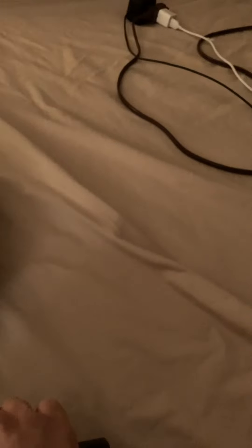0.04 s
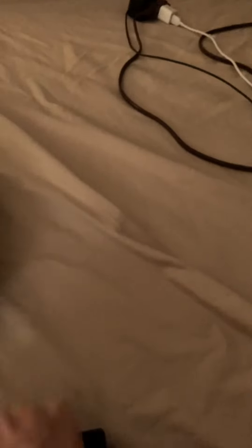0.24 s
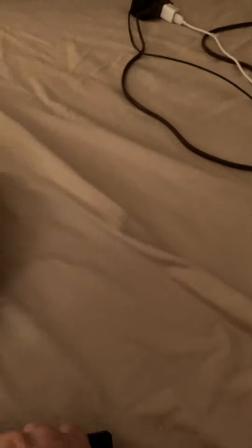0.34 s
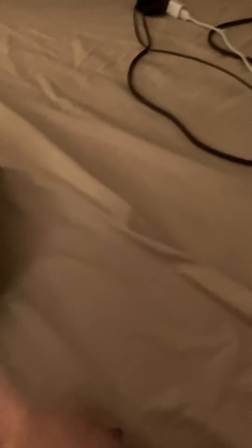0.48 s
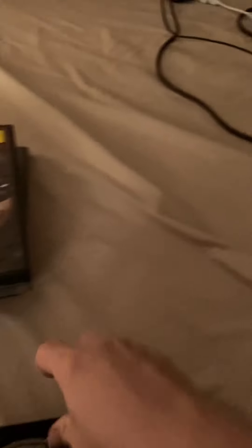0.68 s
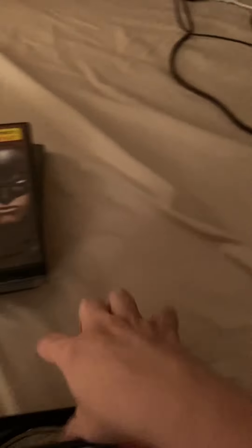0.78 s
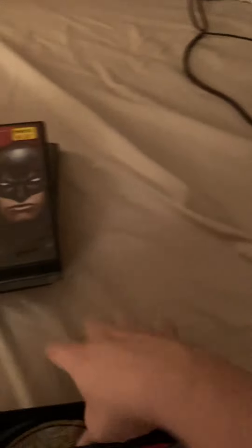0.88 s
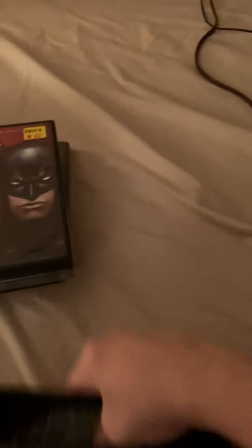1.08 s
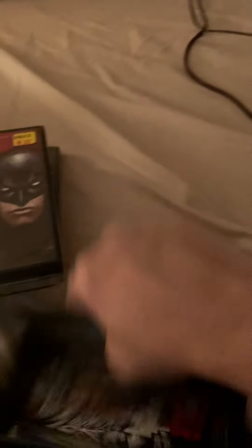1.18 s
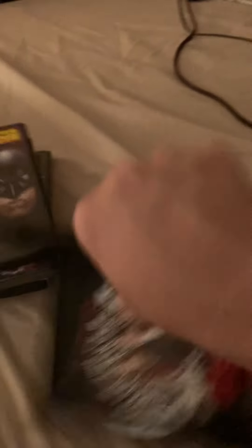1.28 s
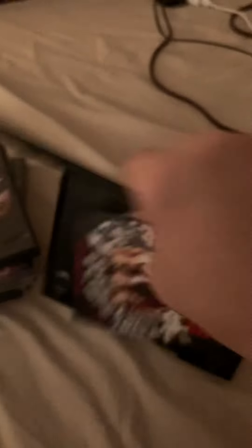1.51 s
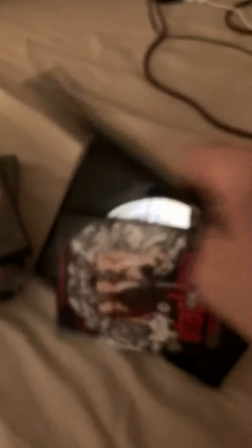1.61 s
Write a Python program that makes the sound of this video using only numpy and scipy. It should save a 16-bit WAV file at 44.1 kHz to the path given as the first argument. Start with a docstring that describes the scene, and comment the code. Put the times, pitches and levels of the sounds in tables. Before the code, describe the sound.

A hollow plastic disc case snaps open in a rapid run of pops, followed by faint scraping and light clicks, then a loud clack as it lands on a bed, close up in a small quiet bedroom.

```python
"""In a small bedroom, close to two microphone ports, a plastic disc case is snapped open over a bed.
Its catches pop in a quick run of damped shell modes, noise clacks, bright ticks and edge pings.
Random slips and hiss make fingers scrape the shell and paper insert, and a hand brush the sheet.
Soft thumps, runs of slip clicks and gliding squeaks join in; the open case clacks down and settles.
A steady noise floor lies underneath, and a short decaying-noise room tail follows the case."""
import sys
import numpy as np
from scipy import signal
from scipy.fft import rfft, irfft, next_fast_len
from scipy.io import wavfile

SR = 44100
rng = np.random.default_rng(int(sys.argv[2]) if len(sys.argv) > 2 else 0)


def dump(signal):
    """Clip the signal to [-1, 1] and save it as 16-bit WAV at the path in sys.argv[1]."""
    limited = np.clip(np.atleast_2d(signal).T, -1, 1)
    pcm = np.round(limited * 32767).astype(np.int16)
    wavfile.write(sys.argv[1], SR, pcm)


N = 72765

# In every colour table the levels shape the tone only; the sound's loudness is set elsewhere.
# Tone of the quiet room: freq_hz, level_db
FLOOR_TONE = [(25, -13), (65, -3.5), (140, -5.5), (260, -15.5), (500, -17.5), (900, -33.5), (4000, -29.5),
              (16000, -41)]
# Decay of the room: freq_hz, t60_s
ROOM_DECAY = [(100, 0.35), (500, 0.18), (2000, 0.29), (8000, 0.2), (16000, 0.039)]
# Stereo width of the room tail: freq_hz, side_over_mid_db
TAIL_WIDTH = [(60, -18), (350, -19), (1000, -1), (8000, -1)]
# Arrival at the two ports, shut case held in the hands: freq_hz, left_lead_rad, left_minus_right_db
# In all three port tables the differences are scaled down below BASS_ALIKE_HZ.
HELD_ARRIVAL = [(200, 1, 1.5), (520, 0, -0.5), (633, -1.7, -5), (739, -4, -7), (1030, -5.5, 0.5),
                (1310, -5.5, 1), (1635, -3.5, -4), (2008, -1.5, -5.5), (2700, -2.5, 1), (3016, -3, 4.5),
                (3440, -6, -.5), (3940, -5.5, 0.5), (4940, -4, 2), (5810, -2.5, 0), (7950, -1, -1),
                (9340, 0.86, -1), (11030, 2.5, 5), (13800, 5, -2.5)]
# The same for the open case in the hands: freq_hz, left_lead_rad, left_minus_right_db
OPEN_ARRIVAL = [(200, 1, 0), (510, 0.44, -1), (678, -1.7, -7), (677, -4, -6), (1000, -4.5, 1),
                (1510, -5.5, 1.5), (1980, -3, -7), (2360, -1.15, 2), (2660, -1.67, 1), (3340, -2, 0),
                (4300, -1.5, -0.5), (5600, -3, -1), (6420, -2, 1.5), (8100, -0.46, 0), (9290, 0.53, -1),
                (10830, 2.5, 0.5), (13800, 5.5, -1)]
# The same for the case on the bed: freq_hz, left_lead_rad, left_minus_right_db
BED_ARRIVAL = [(200, 1, -2), (450, -1.3, 1), (652, -0.4, -6), (692, -3, -5.5), (1230, -6, 0.5),
               (1530, -6, 2), (2190, -8, -0.5), (2550, -8, 2), (3220, -8.5, -6), (3850, -11, 6),
               (4340, -8, 2.5), (5100, -9, -3), (6660, -8.5, 2.5), (7900, -7, 0), (9760, -5, -1.5),
               (11200, -4, 6), (12000, -4.5, -6), (15100, 1, 4)]
# The flexing lid and the case meeting the mattress: start_s, level_db
THUMP_EVENTS = [(0.21, -19), (.243, -12.5), (0.264, -28.5), (.306, -35.5), (0.376, -50), (0.409, -44),
                (0.638, -45), (0.917, -42), (0.942, -35.5), (1.247, -30.5), (1.303, -20.5), (1.362, -42.5),
                (1.493, -45), (1.552, -39)]
# Low resonances of the whole case, before scatter: pitch_hz, level_db, t60_s
THUMP_RESONANCES = [(69.3, -1, 0.11), (97.3, 0, 0.074), (191.3, -1.5, 0.086), (232, -6.5, 0.087)]
# Low handling rumble, two stretches, before its trim: time_s, level_db
JOSTLE_STROKES = [
    [(0.33, -67), (0.342, -57.5), (0.598, -72), (0.65, -57.5), (0.712, -105), (0.886, -61.5), (0.928, -36),
     (1.192, -68), (1.21, -86)],
    [(1.34, -46), (1.414, -44), (1.46, -52), (1.514, -45), (1.53, -54), (1.558, -40), (1.58, -55),
     (1.65, -52.5)],
]
# Tone of that rumble: freq_hz, level_db
JOSTLE_TONE = [(20, -25.5), (60, -6.5), (110, -2.5), (220, -8), (400, -4), (700, -22.5), (2000, -63.5)]
# Cloth and paper brushing, two stretches, before its trim: time_s, level_db
BRUSH_STROKES = [
    [(0.3, -46), (0.456, -66), (0.496, -50), (0.62, -49), (0.662, -65), (0.74, -71.5), (0.798, -45.5),
     (0.894, -50.5), (0.942, -44), (1.206, -56.5), (1.21, -57)],
    [(1.33, -44), (1.384, -59), (1.392, -38.5), (1.406, -70), (1.418, -60), (1.426, -62), (1.496, -60),
     (1.514, -37), (1.578, -54.5), (1.632, -54.5), (1.65, -52)],
]
# Tone of the brushing: freq_hz, level_db
BRUSH_TONE = [(300, -9), (1500, -10.5), (3500, -9.5), (4500, -9.5), (5600, 0.5), (7000, 0), (8800, -2),
              (10500, -3), (12300, -15), (14500, -12.5), (16000, -19)]
# Fingers scraping the shell, two stretches, before their trim: time_s, level_db
SCRAPE_STROKES = [
    [(0.3, -38), (0.352, -54), (0.514, -52.5), (0.54, -46.5), (0.568, -61.5), (0.618, -49.5), (0.676, -80),
     (0.908, -61), (0.925, -44), (0.948, -39.5), (1.088, -56.5), (1.108, -46.5), (1.156, -66), (1.21, -58)],
    [(1.3, -41.5), (1.345, -62), (1.356, -41.5), (1.38, -66), (1.394, -45), (1.412, -69), (1.446, -53.5),
     (1.454, -66), (1.488, -62.5), (1.504, -48.5), (1.536, -72), (1.548, -55), (1.562, -54.5),
     (1.65, -57.5)],
]
# Tone of the scraping: freq_hz, level_db
SCRAPE_TONE = [(40, -17.5), (100, -8), (220, -5), (380, -4), (600, 2), (790, -9), (1200, -9.5),
               (1800, -0.5), (2400, -10.5), (3300, -7.5), (4400, -9), (5500, -14), (10000, -32),
               (16000, -40.5)]
# A fingertip sticking and slipping on plastic, pitches before waver:
# start_s, length_s, start_pitch_hz, end_pitch_hz, level_db
SQUEAK_EVENTS = [(0.819, 0.033, 496, 380, -55.5), (0.869, .016, 703, 545, -51),
                 (1.109, 0.046, 2150, 4200, -51)]
# Short runs of clicks: start_s, length_s, level_db
# The last is a brief grainy swell ahead of the loud clack; the others are plastic rubbing on plastic.
CLICK_RUNS = [(0.191, 0.01, -41.5), (0.928, 0.012, -37.5), (.963, 0.0083, -37), (0.981, .012, -49),
              (1.002, .014, -46), (1.219, 0.016, -37)]
# Tone of the click runs: freq_hz, level_db
CLICK_TONE = [(300, -16.5), (1000, -9), (1800, 1.5), (2600, 0.5), (4200, -4), (5400, 2), (8500, -12),
              (12000, -20.5), (16000, -27.5)]
# Knocks on the open case: start_s, shell_db, clack_db, tick_db, shell_speed_ratio, ping_db, ping_hz
# The speed ratio multiplies the shell pitch and divides its attack and decay times, for catches too.
KNOCK_EVENTS = [(.4075, -46.5, -43.5, -49, 0.88, -46, 305), (.528, -50, -37, -48, 1.25, -30, 1758),
                (.535, -59, -52, -50, 1.6, -39.5, 3870), (.547, -47, -44, -64, 1.1, -41, 4090),
                (.559, -62, -60, -60, 0.74, -38.5, 378), (.581, -49, -53, -44, 1.1, -36, 523),
                (.589, -49, -56, -43, 1.28, -38, 386), (.623, -47.5, -60, -51, 1, -49, 364.4),
                (.634, -48, -51.5, -54, 1.1, -42, 485), (.912, -31, -36.5, -37, 1.2, -26, 1800),
                (.9225, -29.5, -56, -57, 1, -40, 2750), (.934, -35, -42, -33, .8, -35, 3150),
                (.9405, -33.5, -52, -47, .75, -37, 1750), (.9505, -22, -36, -31.5, 1.3, -35, 2040),
                (.957, -38, -39, -38, 1, -33, 1630), (.971, -28.5, -48, -34.5, 1.1, -37, 1720),
                (.9985, -48, -35.5, -38.5, 0.79, -38, 4120), (1.013, -35, -52, -42, 1.4, -33, 1630),
                (1.054, -38.5, -44, -41, 1.11, -40, 1640), (1.105, -51, -63, -43, 0.87, -43, 1300),
                (1.1885, -64, -48, -54, 1.3, -48, 1270), (1.2305, -17, -23, -12, 2.2, -15.5, 2500),
                (1.2345, -9.5, -15.5, -17.5, 1, -11.5, 1330), (1.2405, -40, -26, -34, 1.3, -19, 1523),
                (1.2435, -28, -32, -46, 1, -19.5, 920), (1.2938, -34, -32.5, -25, 0.96, -20.5, 4480),
                (1.2987, -49, -28, -21, 1.1, -25.5, 4260), (1.305, -21.5, -33, -27, 1.1, -21, 594),
                (1.353, -40, -41.5, -45, 0.86, -38, 1610), (1.390, -40, -45, -47, 0.955, -33.5, 4570),
                (1.394, -30.5, -58, -59, 1.2, -51, 1670), (1.416, -38.5, -54, -45.5, 1, -40.5, 4450),
                (1.439, -43.5, -51, -52, 1.214, -49, 4500), (1.513, -52, -55, -34, 0.77, -38, 4570),
                (1.548, -35.5, -51, -35, 1.05, -48, 1650), (1.554, -34, -56, -62, .85, -32, 407),
                (1.602, -39, -64, -52, 0.81, -41, 1330)]
# Open shell damped by the bed, before speed ratio and scatter: pitch_hz, level_db, t60_s
BED_SHELL = [(360.7, 4.5, 0.068), (399.5, 0, 0.05), (466.2, 0.5, 0.081), (615.3, -7, 0.093),
             (914, -1, 0.045), (1098, -0.5, 0.026), (1255, -4, 0.028), (1515, -3.5, .025),
             (1805, -15, 0.038), (2530, -19, .07), (3915, -12, .04)]
# Tone of the knock clacks: freq_hz, level_db
KNOCK_TONE = [(100, -4), (250, -12), (450, 2), (750, -1), (1100, 0.5), (1600, 2), (2250, -11), (3400, -1.5),
              (4400, -4.5), (5300, -16.5), (9000, -13), (16000, -55)]
# Catches letting go: start_s, shell_db, clack_db, tick_db, shell_speed_ratio, ping_db, ping_hz
CATCH_EVENTS = [(.2038, -8.5, -6, -27, 1.005, -16, 4103), (.2125, -16, -10, -24, 1.04, -19, 1413),
                (.2222, -20, -16, -18, 0.94, -33, 3630), (.2298, -32, -13.5, -16, 1.18, -21, 3790),
                (.2384, -29, -16, -16.5, 0.87, -27.5, 2470), (.2432, -33.5, -20, -32, 0.85, -24.5, 3850),
                (.2555, -26.5, -17.5, -13.5, 1.02, -27.5, 4480),
                (.2628, -33.5, -20, -28.5, 1.06, -36.5, 2480)]
# Shell held in the hands, before speed ratio and scatter: pitch_hz, level_db, t60_s
HELD_SHELL = [(244, -1, 0.11), (314.5, 2.5, 0.13), (519, -4, 0.05), (543.5, 2, 0.11), (582.2, -3, 0.11),
              (1150, -10, 0.22), (1336, 1.5, 0.044), (1396, -4.5, .05), (1600, -13.5, .09),
              (2053, 0.5, .09), (2156, -12, .12), (3810, -9, .1), (4040, -13, .09), (4380, -12, .06)]
# Tone of the catch clacks: freq_hz, level_db
CATCH_TONE = [(100, -17), (500, 2), (800, -9), (1300, -1), (1650, -3.5), (2050, -3), (2900, -7), (3400, -8),
              (3850, -5.5), (4500, -9), (5400, -12), (9000, -30), (16000, -41.5)]
# Tone of the bright ticks: freq_hz, level_db
TICK_TONE = [(1000, -33), (3500, -11.5), (4400, -6.5), (5300, -1.5), (7000, -4), (8600, 1), (10700, -4),
             (12300, -11), (14500, -12), (16000, -21.5)]
# The stiff edge where it is struck, before scatter: ratio_to_ping, level_db, t60_s
EDGE_RESONANCES = [(.94, -5, .016), (1, 1, 0.032), (1.07, -7, .016)]

FLOOR_DB, ROOM_DB = -73.5, -17.5
SCRAPE_TRIM_DB, BRUSH_TRIM_DB, JOSTLE_TRIM_DB = 1, -3, -0.5
HANDLING_START_S, HANDLING_RISE_S = 0.1924, 0.0025
SQUEAK_WAVER = 0.015  # share of the pitch, standard deviation at each waver point
CLICKS_PER_S, CLICK_SPREAD_DB = 650, 4.5  # nominal rate, before the gaps are made uneven
SHELL_LOW_HZ = 180  # the thin shell radiates little below this
CONTACT_S = 0.00032  # rise of each crack
SCATTER_DB = 1.2  # level variation of each mode
LAID_DOWN_S, LAYING_S = 1.17, 0.05  # when the case moves from hands to bed, and how long that takes
BASS_ALIKE_HZ = 400
LOW_CUT_HZ, TOP_HZ = 47, 16000


def amp(db):
    """Decibels to linear gain."""
    return 10 ** (np.asarray(db) / 20)


def unit(x):
    """Scale a sound to an RMS of one."""
    return x / np.sqrt(np.mean(x ** 2) + 1e-20)


def along(points, hz):
    """Read a curve of (frequency, value) points on a log frequency axis."""
    point_hz, value = np.transpose(points)
    return np.interp(np.log(hz + 1), np.log(point_hz + 1), value)


def filtered(x, response):
    """Multiply the spectrum of a sound by a function of frequency."""
    size = next_fast_len(N + SR // 2)
    spectrum = rfft(x, size) * response(np.fft.rfftfreq(size, 1 / SR))
    return irfft(spectrum, size)[..., :N]


def coloured(x, colour, size=2048):
    """Tint a sound through a causal minimum-phase filter of unit energy."""
    # folding the cepstrum forward in time gives minimum phase
    cepstrum = irfft(np.log(amp(along(colour, np.fft.rfftfreq(size, 1 / SR)))))
    cepstrum[1:size // 2] *= 2
    cepstrum[size // 2 + 1:] = 0
    impulse = irfft(np.exp(rfft(cepstrum)))
    return signal.fftconvolve(x, impulse / np.linalg.norm(impulse))[:N]


def high_passed(x, cut_hz):
    """Roll off the bass with a second-order Butterworth filter."""
    return signal.sosfilt(signal.butter(2, cut_hz, 'high', fs=SR, output='sos'), x)


def add(track, start_s, sound):
    """Mix a sound into a track at a given time."""
    part = track[max(round(start_s * SR), 0):][:len(sound)]
    part += sound[:len(part)]


def ring(modes, t, attack_s, detune):
    """Sum damped sine modes whose level and pitch differ a little at every blow."""
    hz, db, t60 = np.transpose(modes)[:, :, None]
    level, pitch = rng.standard_normal((2, len(modes), 1))
    envelope = amp(db + SCATTER_DB * level - 60 * t / t60)
    waves = envelope * np.sin(2 * np.pi * hz * (1 + detune * pitch) * t)
    attack = 1 - np.exp(-(t / attack_s) ** 2)
    return waves.sum(0) * attack / np.linalg.norm(amp(db))


def burst(t, t60, tail_db, tail_t60):
    """A sharp noise crack with the dense plastic ring behind it."""
    decay = amp(-60 * t / t60) + amp(tail_db - 60 * t / tail_t60)
    attack = 1 - np.exp(-t / CONTACT_S)
    return rng.standard_normal(len(t)) * decay * attack


def placed(x, ports):
    """Direction sets phase and level between the ports; long waves reach both alike."""
    ports = np.array(ports)

    def response(hz):
        # each port takes half the difference, left plus and right minus
        half = np.array([[.5], [-.5]]) * np.minimum(hz / BASS_ALIKE_HZ, 1) ** 2
        phase = half * along(ports[:, :2], hz)
        level_db = half * along(ports[:, ::2], hz)
        return np.exp(1j * phase) * amp(level_db)

    return filtered(x, response)


def quiet_room_floor():
    """Steady tinted noise under everything."""
    return amp(FLOOR_DB) * unit(coloured(rng.standard_normal(N), FLOOR_TONE))


def room(x):
    """Short bedroom tail: noise dying at its own rate in each band, different at each port."""
    hz, t, noise = signal.stft(rng.standard_normal((2, SR // 2)), SR, nperseg=256)
    decay = amp(-60 * t / along(ROOM_DECAY, hz)[:, None])
    tail = signal.istft(noise * decay, SR, nperseg=256)[1]
    tail /= np.linalg.norm(tail[0])
    mid, side = signal.fftconvolve(x[None], tail, axes=1)[:, :N]
    side = filtered(side, lambda hz: amp(along(TAIL_WIDTH, hz)))
    return amp(ROOM_DB) * np.array([mid + side, mid - side])


def thumps():
    """Soft low pushes of the whole case, as slow-attack damped modes."""
    out, t = np.zeros(N), np.arange(SR // 4) / SR
    for start_s, level_db in THUMP_EVENTS:
        add(out, start_s, amp(level_db) * ring(THUMP_RESONANCES, t, attack_s=0.0035, detune=0.04))
    return out


def friction(strokes, colour, slips_per_s, spread_db, smooth_db):
    """Tiny random slips over a smooth hiss, following the level of the strokes."""
    t = np.arange(N) / SR
    slip_here = rng.random(N) < slips_per_s / SR
    slip_db = spread_db * np.clip(rng.standard_normal(N), -2, 2)
    slips = slip_here * rng.choice([-1, 1], N) * amp(slip_db)
    hiss = amp(smooth_db) * rng.standard_normal(N)
    rub = unit(coloured(unit(slips) + hiss, colour))
    level = amp(np.interp(t, *np.vstack(strokes).T))
    fade_in = np.clip((t - HANDLING_START_S) / HANDLING_RISE_S, 0, 1)
    return rub * level * fade_in


def handling():
    """Friction of fingers on plastic, of paper and cloth brushing, and of the case shifting on the bed."""
    scrape = friction(SCRAPE_STROKES, SCRAPE_TONE, slips_per_s=1400, spread_db=8.0, smooth_db=-1.5)
    brush = friction(BRUSH_STROKES, BRUSH_TONE, slips_per_s=810, spread_db=10.5, smooth_db=4)
    jostle = friction(JOSTLE_STROKES, JOSTLE_TONE, slips_per_s=130, spread_db=11.5, smooth_db=-5)
    return amp(SCRAPE_TRIM_DB) * scrape + amp(BRUSH_TRIM_DB) * brush + amp(JOSTLE_TRIM_DB) * jostle


def squeaks():
    """Fingertip stick-slip as short wavering sine glides that swell and fade."""
    out = np.zeros(N)
    for start_s, length_s, start_hz, end_hz, level_db in SQUEAK_EVENTS:
        progress = np.linspace(0, 1, int(length_s * SR))
        waver = np.interp(progress, np.linspace(0, 1, num=10), rng.standard_normal(10))
        hz = start_hz * (end_hz / start_hz) ** progress * (1 + SQUEAK_WAVER * waver)
        tone = np.sin(2 * np.pi * np.cumsum(hz) / SR)
        add(out, start_s, amp(level_db) * np.sin(np.pi * progress) * tone)
    return out


def click_runs():
    """Unevenly spaced clicks of random strength that tend to grow along each run."""
    out = np.zeros(N)
    for start_s, length_s, level_db in CLICK_RUNS:
        gap, size = rng.standard_normal((2, 40))
        at_s = np.cumsum(np.exp(.4 * gap)) / CLICKS_PER_S
        strength = np.sqrt(at_s) * amp(CLICK_SPREAD_DB * size)
        keep = at_s < length_s
        position = (at_s[keep] * SR).astype(int)
        clicks = np.bincount(position, strength[keep], int(length_s * SR) + 1)
        add(out, start_s, amp(level_db) * unit(clicks))
    return coloured(out, CLICK_TONE)


def blows(events, modes, colour, clack_t60, tail_db, tail_t60, tick_t60, attack_s, ping_attack_s):
    """Each contact gives a shell ring, a clack, a bright tick and a short ping of the edge."""
    shell, clack, tick = np.zeros((3, N))
    t = np.arange(SR // 4) / SR
    for start_s, shell_db, clack_db, tick_db, speed, ping_db, ping_hz in events:
        edge = np.multiply(EDGE_RESONANCES, [ping_hz, 1, 1])
        add(shell, start_s, amp(shell_db) * ring(modes, speed * t, attack_s, detune=0.0061))
        add(shell, start_s, amp(ping_db) * ring(edge, t, ping_attack_s, detune=.008))
        add(clack, start_s, amp(clack_db) * burst(t, clack_t60, tail_db, tail_t60))
        add(tick, start_s, amp(tick_db) * burst(t, tick_t60, tail_db=-19, tail_t60=0.076))
    return high_passed(shell, SHELL_LOW_HZ) + coloured(clack, colour) + coloured(tick, TICK_TONE)


def knocks():
    """Fingers, lid and bed knock against the open case and excite its damped shell."""
    return blows(KNOCK_EVENTS, BED_SHELL, KNOCK_TONE, clack_t60=0.039, tail_db=-22, tail_t60=0.074,
                 tick_t60=0.022, attack_s=0.001, ping_attack_s=0.00049)


def catches():
    """The catches along the edge pop one after another and set the held shell ringing."""
    return blows(CATCH_EVENTS, HELD_SHELL, CATCH_TONE, clack_t60=0.016, tail_db=-15.5, tail_t60=0.058,
                 tick_t60=0.019, attack_s=0.00079, ping_attack_s=0.00094)


def scene():
    """The case is snapped open in the hands, handled, then laid on the bed, over a quiet room."""
    floor = quiet_room_floor()
    case = thumps() + handling() + squeaks() + click_runs() + knocks()
    snap = catches()
    laid = np.clip((np.arange(N) / SR - LAID_DOWN_S) / LAYING_S, 0, 1)  # 0 in the hands, 1 on the bed
    in_hands = placed(case * (1 - laid) + floor, OPEN_ARRIVAL)
    on_bed = placed(case * laid, BED_ARRIVAL)
    return placed(snap, HELD_ARRIVAL) + in_hands + on_bed + room(snap + case)


def record(dry):
    """The microphone sheds the deepest bass and falls off steeply above its band limit."""
    thin = high_passed(dry, LOW_CUT_HZ)
    return filtered(thin, lambda hz: 1 / np.sqrt(1 + (hz / TOP_HZ) ** 160))


dry = scene()
out = record(dry)
dump(out)
```